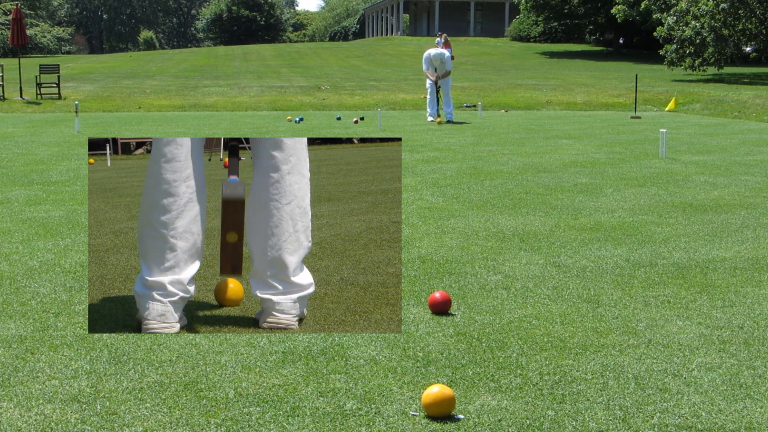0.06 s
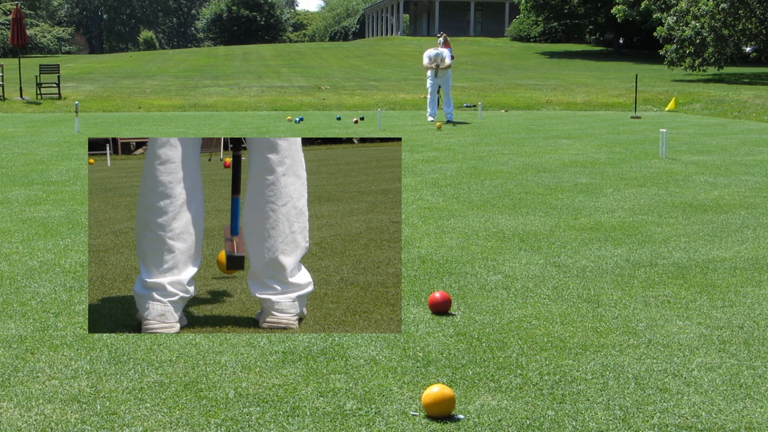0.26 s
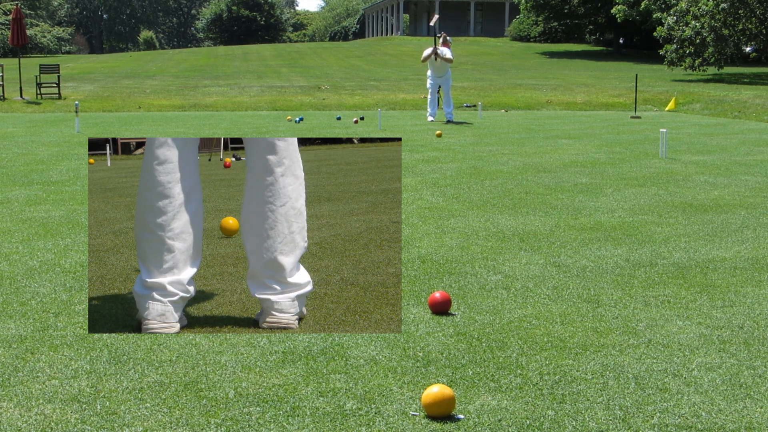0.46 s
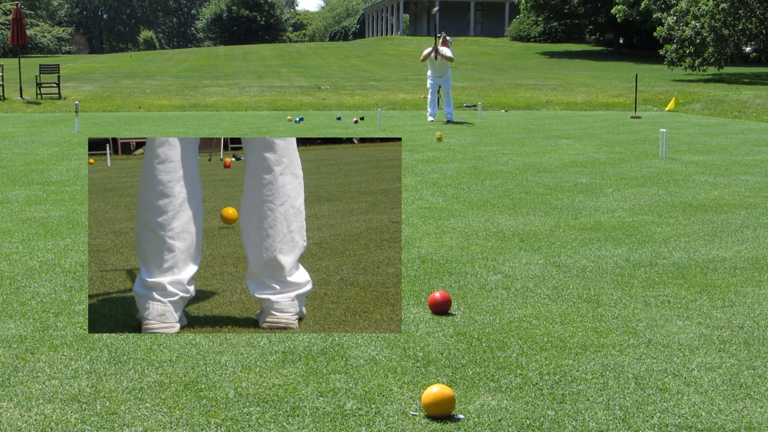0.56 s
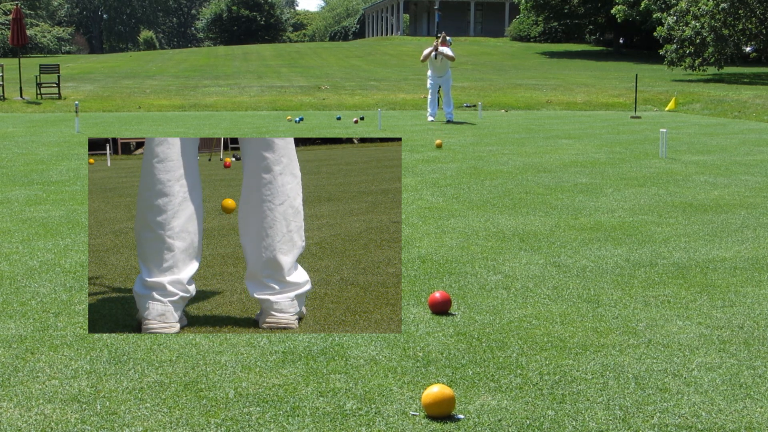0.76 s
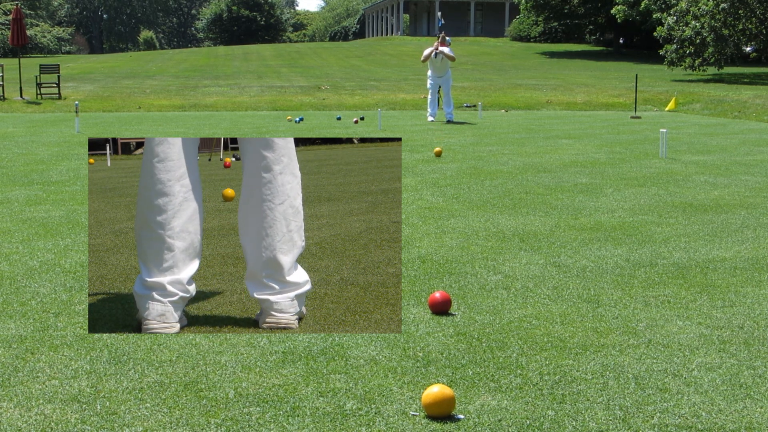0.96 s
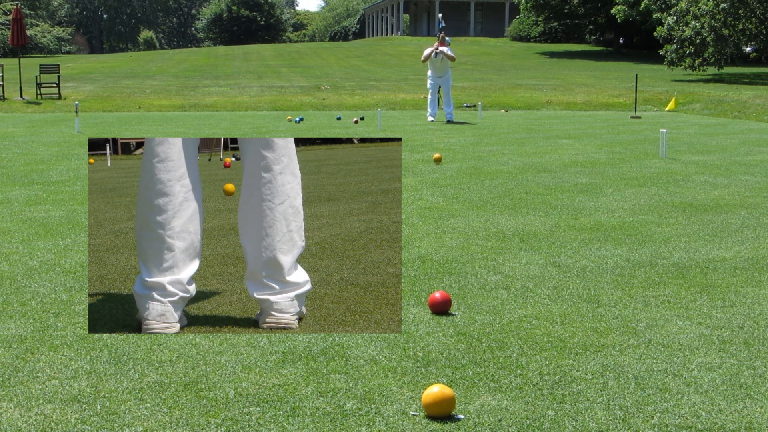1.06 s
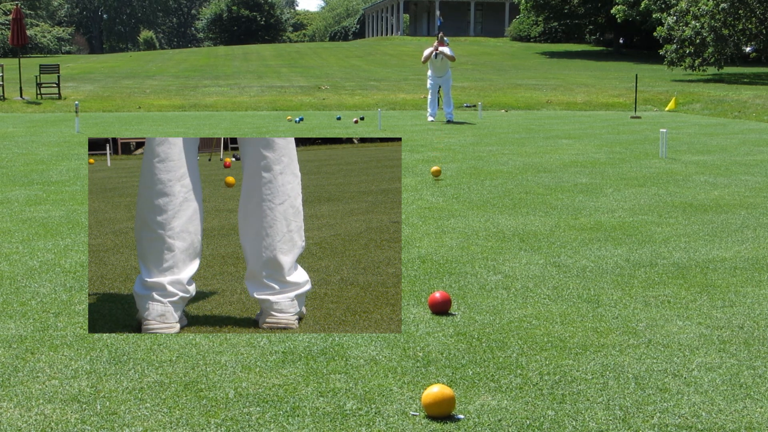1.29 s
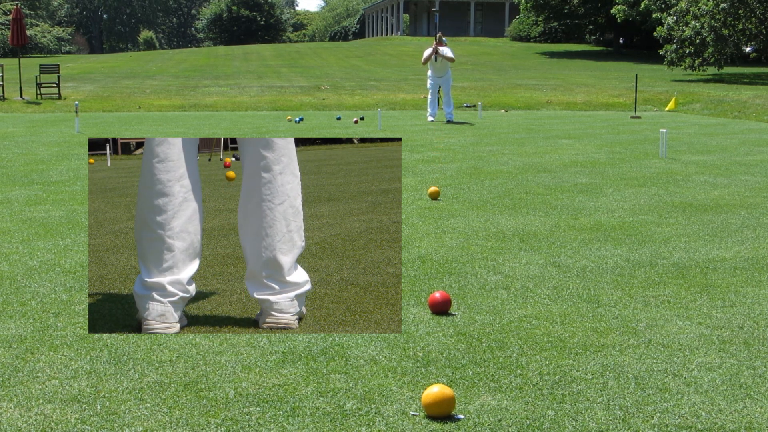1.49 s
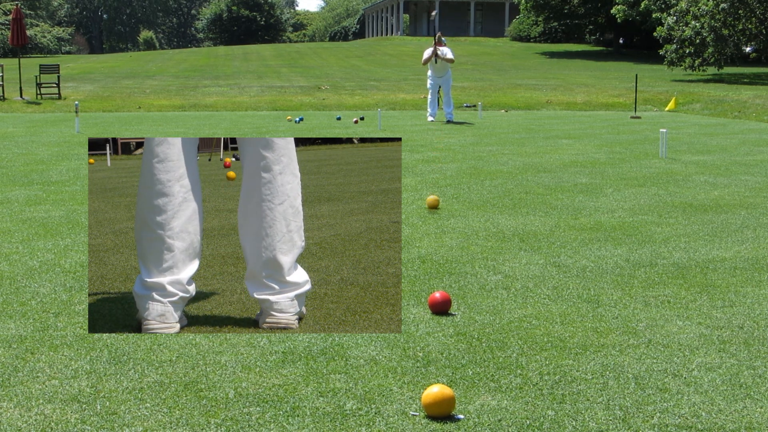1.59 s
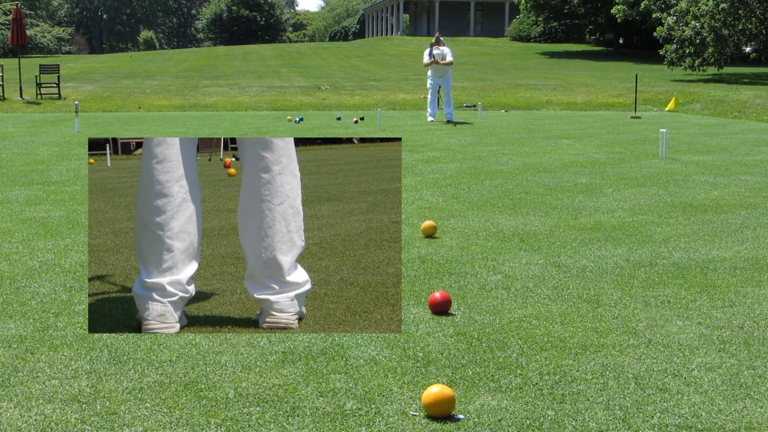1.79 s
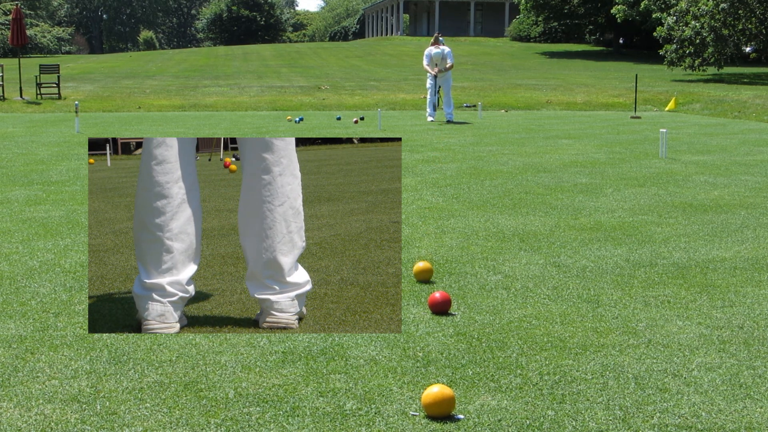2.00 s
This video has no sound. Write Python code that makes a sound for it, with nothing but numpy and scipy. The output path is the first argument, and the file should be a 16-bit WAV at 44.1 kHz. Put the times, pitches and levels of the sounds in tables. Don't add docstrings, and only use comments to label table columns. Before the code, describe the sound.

A wooden mallet cracks once against a hard ball outdoors, followed by a short leafy echo

```python
import sys
import numpy as np
from scipy import signal
from scipy.fft import rfft, irfft
from scipy.io import wavfile
from scipy.ndimage import uniform_filter1d

SR = 44100
rng = np.random.default_rng(int(sys.argv[2]) if len(sys.argv) > 2 else 0)


def dump_mix(stems):
    frames = np.atleast_2d(stems).T
    limited = np.clip(frames, -1, 1)
    pcm = np.round(limited * 32767).astype(np.int16)
    wavfile.write(sys.argv[1], SR, pcm)


def ratio(d):
    e = np.asarray(d, float) / 20
    return 10 ** e


N = 90404
T = np.arange(N) / SR
FREQ = np.maximum(np.fft.rfftfreq(N, 1 / SR), 1)
STRIKE_S = .207649
ECHO_CORE_S = .0012


def curve(table):
    hz, value = np.transpose(table)
    return np.interp(np.log(FREQ), np.log(hz), value)


def pan(left_over_right_db):
    return ratio(np.array([[left_over_right_db / 2], [-left_over_right_db / 2]]))


def place(x, s):
    return irfft(rfft(x, N) * np.exp(-2j * np.pi * FREQ * s), N)


def walk(rate_hz):
    k = int(SR / rate_hz)
    steps = np.repeat(rng.standard_normal(N // k + 1), k)
    return 0.7 * uniform_filter1d(uniform_filter1d(steps, k), k)[:N]


# frequency in Hz, left level in dB, right level in dB.
WHISTLE_LINES = [(7866.83, -57, -66), (15733.66, -66, -68)]


def whistle():
    out = 0
    for hz, left_db, right_db in WHISTLE_LINES:
        out = out + np.sqrt(2) * ratio(np.array([[left_db], [right_db]])) * np.sin(2 * np.pi * hz * T)
    return out


# frequency in Hz, density in dB per Hz.
AIR_SPECTRUM = [(26, -21), (44, -2), (129, -1.5), (320, -10), (520, -18), (790, -11), (6380, -32),
                (15500, -41.5)]
# frequency in Hz, level difference in dB.
AIR_BALANCE_DB = [(60, 9.8), (110, 15), (200, 12.4), (380, 3.9), (700, 3.5), (1290, 1.9), (2380, 0.33),
                  (4400, 0.33), (8120, 1.3), (15000, 0.5)]
# frequency in Hz, correlation from -1 to 1.
AIR_LIKENESS = [(60, -0.91), (300, -0.62), (1400, -0.5), (5000, -0.64), (12000, -0.4)]
# frequency in Hz, phase in rad.
AIR_LAG_RAD = [(60, .1), (250, .45), (900, .45), (2500, .25), (5000, 0)]


def air():
    level_db, swell_db, flicker_db = -45.5, .5, .8
    a, b = rfft(rng.standard_normal((2, N)))
    alike = np.clip(curve(AIR_LIKENESS), -.98, .98)
    lean = ratio(curve(AIR_BALANCE_DB) / 2)
    left = a * lean
    right = (alike * a * np.exp(-1j * curve(AIR_LAG_RAD)) + np.sqrt(1 - alike ** 2) * b) / lean
    mono_gain = np.sqrt((lean ** 2 + lean ** -2 + 2 * alike) / 4)
    pair = np.array([left, right]) * ratio(curve(AIR_SPECTRUM)) / mono_gain
    swell = swell_db * walk(0.94)
    half_octave = 2 * np.log2(FREQ / 20)
    out = 0
    for k in range(21):
        band = np.cos(np.pi / 2 * np.clip(half_octave - k, -1, 1)) ** 2
        out = out + irfft(pair * band, N) * ratio(swell + flicker_db * walk(11.74))
    return out * ratio(level_db) / np.sqrt(np.mean(out.mean(0) ** 2))


# start in seconds, level in dB re the blow, pitch in Hz, width in Hz,
# left over right in dB.
WALL_SLAPS = [
    (.2503, -24.5, 730, 500, 7),
    (.2533, -31, 800, 600, 17),
    (0.2631, -27.5, 1190, 1800, -10),
    (0.6849, -26.5, 820, 250, 21),
]


def slaps(hit):
    out = 0
    for start_s, db, hz, width_hz, pan_db in WALL_SLAPS:
        b, a = signal.iirpeak(hz, hz / width_hz, fs=SR)
        dull = signal.lfilter(b, a, signal.lfilter(b, a, hit.mean(0)))
        out = out + ratio(db) * pan(pan_db) * place(dull, start_s)
    return out


# frequency in Hz, gain in dB.
FOLIAGE_GAIN = [(300, -30), (700, -3.5), (1500, 2), (2400, 3.5), (3600, 5.5), (4600, 2), (7500, 7),
                (14000, 2)]


def trees(hit):
    start_s, rise_s, near_t60_s, far_t60_s = .253, .054, .3, 1.4
    level_db, far_db, pan_db, spread_db = -40.5, -5, 6, 2.0
    leaves_per_s, alike, far_dull_hz = 6000, 0.63, 5500
    age = np.maximum(T - start_s, 0)
    rise = np.sin(np.pi / 2 * np.clip(age / rise_s, 0, 1)) ** .8
    after = np.maximum(age - rise_s, 0)
    near = rise * ratio(-60 * after / near_t60_s)
    far = rise * ratio(far_db - 60 * after / far_t60_s)

    sizes = rng.choice([-1, 1], (3, N)) * ratio(spread_db * rng.exponential(size=(3, N)))
    leaves = (rng.random((3, N)) < leaves_per_s / SR) * sizes
    leaves = np.sqrt(alike) * leaves[0] + np.sqrt(1 - alike) * leaves[1:]

    core = hit[1] * np.exp(-(T[:hit.shape[1]] / ECHO_CORE_S) ** 2)
    colour = rfft(core, N) * ratio(curve(FOLIAGE_GAIN))
    unit = np.sqrt(np.mean(irfft(rfft(leaves) * colour, N) ** 2))
    both = rfft(leaves * near) + rfft(leaves * far) / (1 + 1j * FREQ / far_dull_hz)
    return irfft(both * colour, N) / unit * ratio(level_db) * pan(pan_db)


def turf(hit):
    level_db, rise_s, end_s, t60_s, tilt = -29, .0025, .0108, .04, .45
    t = T[:hit.shape[1]]
    gate = np.clip(t / rise_s, 0, 1) * np.clip((end_s - t) / .0005, 0, 1)
    gate = gate * ratio(level_db - 60 * t / t60_s)
    common, own = rng.standard_normal(len(t)), rng.standard_normal((2, len(t)))
    blades = signal.lfilter([1, -tilt], 1, (common + 0.14 * own) * gate)
    core = hit * np.exp(-(t / (2 * ECHO_CORE_S)) ** 2)
    return signal.fftconvolve(core, blades, axes=1)[:, :len(t)]


def ring(hz, db, t60_s):
    t = T[:SR // 20]
    return ratio(db) * np.exp(-np.log(1000) * t / t60_s) * np.cos(2 * np.pi * hz * t)


def ring_all(table):
    return sum(pan(pan_db) * ring(hz, db, t60_s) for hz, db, t60_s, pan_db in table)


# frequency in Hz, level in dB, t60 in seconds,
# left over right in dB.
HEAD_BALL_MODES = [(410, -21, .02, 14), (570, -9.2, .013, 7.3), (790, .3, .0062, 2.2),
                   (1190, -15.2, .02, 1.1), (1820, -21, .014, .6), (2580, -21, .0126, 4.5),
                   (3480, -4.5, .0048, 3.7), (4190, -18, .012, 1.9), (5530, -3, .0026, 4.9)]
# frequency in Hz, level in dB, t60 in seconds,
# left over right in dB.
FACE_TICK = [(7050, -31, 0.011, -4), (7667, -30, 0.015, 9), (8390, -31, 0.0094, -9), (9950, -29, 0.012, 5),
             (11100, -35, 0.0069, -7), (13600, -28, .002, 0)]
# corner in Hz (left, then right).
CAPSULE_LOW_CUT_HZ = np.array([[269], [800]])


def blow():
    contact_s, strike_db = .000232, .7
    t = T[:SR // 20]
    contact = np.clip(t / contact_s, 0, 1)
    push = np.sin(np.pi * contact) ** 2
    modes = signal.fftconvolve(ring_all(HEAD_BALL_MODES), push[None] / push.sum(), axes=1)[:, :len(t)]
    hit = -modes - ring_all(FACE_TICK) * contact
    jf = 1j * np.fft.rfftfreq(len(t), 1 / SR)
    low_cut = (jf / (CAPSULE_LOW_CUT_HZ + jf)) ** 2
    return irfft(rfft(hit) * low_cut, len(t)) * ratio(strike_db)


def scene():
    hit = blow()
    direct = hit + turf(hit)
    return whistle() + air() + slaps(direct) + trees(hit) + place(direct, STRIKE_S)


def low_pass(x):
    return signal.sosfilt(signal.butter(12, 16270, fs=SR, output="sos"), x)


def record(dry):
    duck_db, duck_late_s, attack_s, recovery_s = -5.5, .0058, .00077, .035
    top_hz, clip = 15850, 1.0
    age = T - STRIKE_S - duck_late_s
    dip = np.clip(age / attack_s, 0, 1) * np.exp(-(np.maximum(age, 0) / recovery_s) ** 2)
    ducked = dry * ratio(duck_db * dip)
    cut = irfft(rfft(ducked) * np.clip((top_hz - FREQ) / 80, 0, 1), N)
    return low_pass(np.clip(cut, -clip, clip))


dry = scene()
out = record(dry)
dump_mix(out)
```